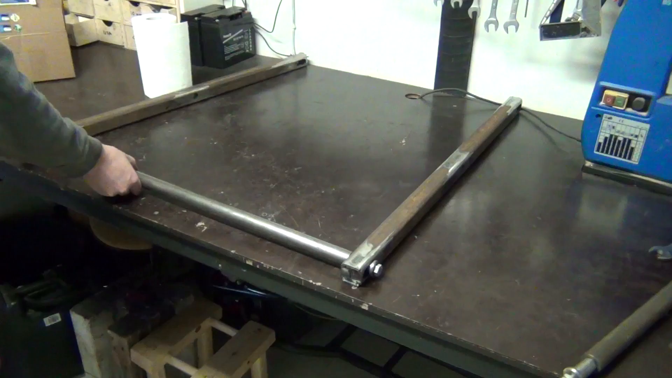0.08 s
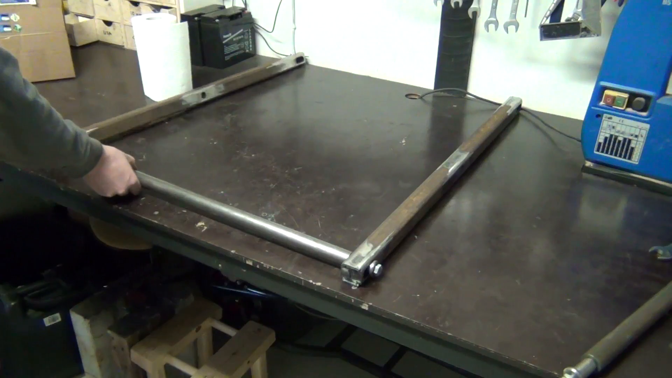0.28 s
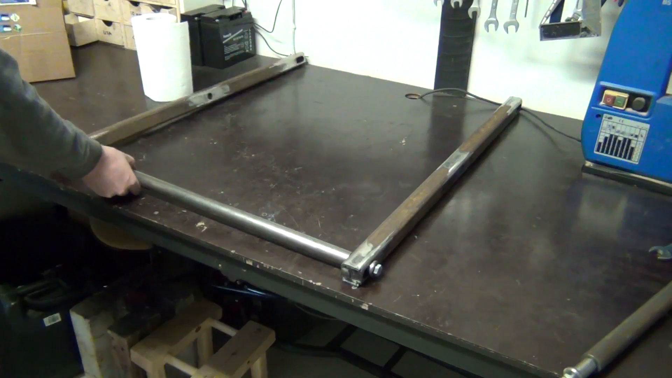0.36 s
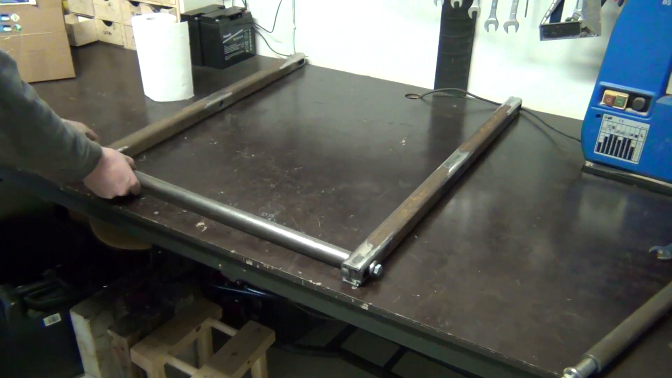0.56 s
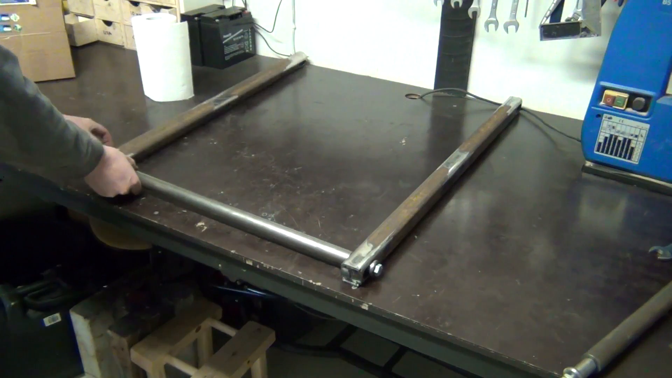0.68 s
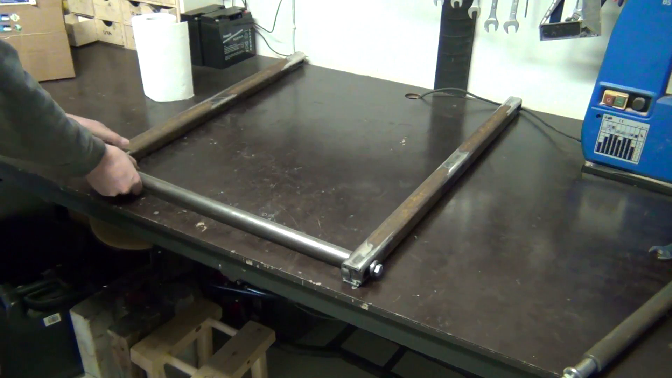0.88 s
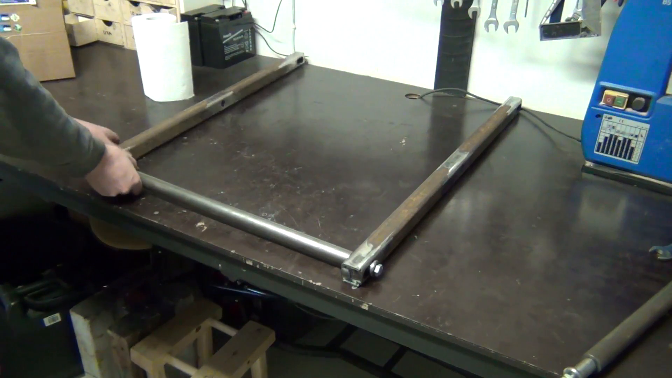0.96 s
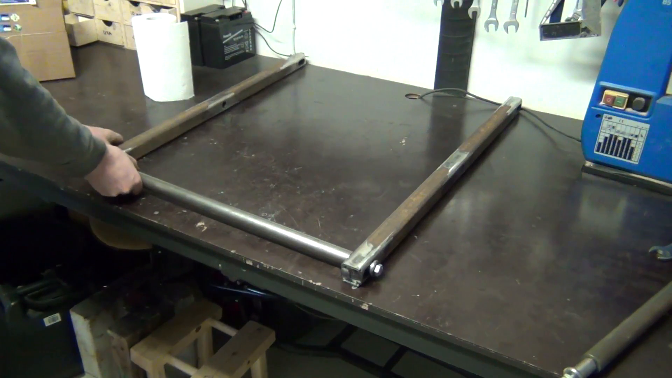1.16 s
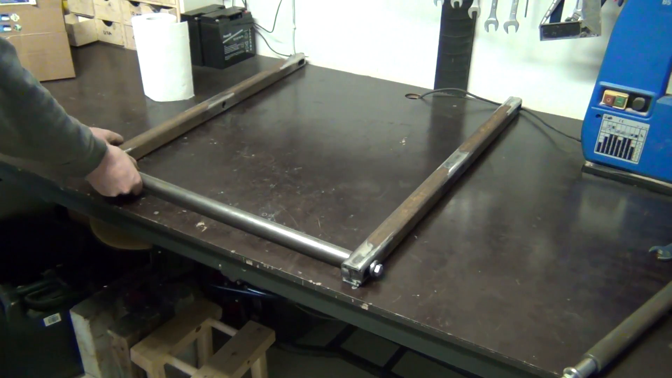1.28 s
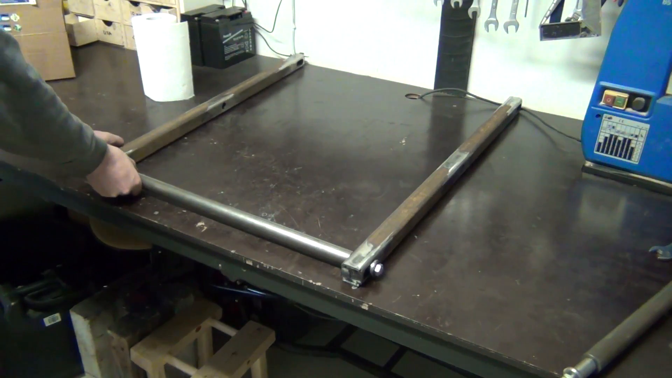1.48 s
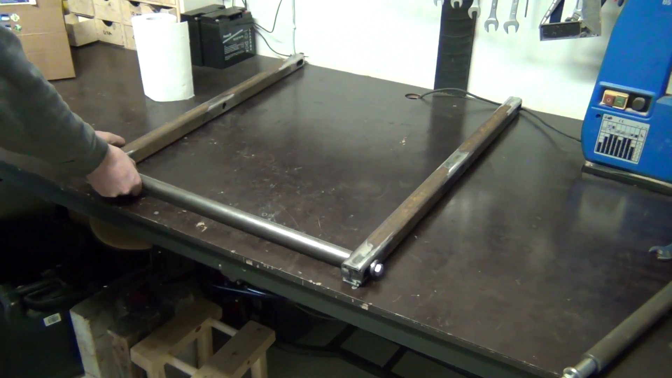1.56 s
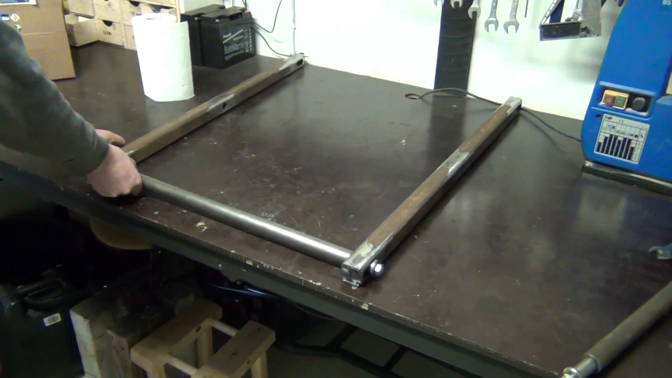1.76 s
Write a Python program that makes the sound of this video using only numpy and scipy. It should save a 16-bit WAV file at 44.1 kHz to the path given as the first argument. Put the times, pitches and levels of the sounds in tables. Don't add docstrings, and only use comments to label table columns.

```python
import sys
import numpy as np
from scipy import signal
from scipy.fft import rfft, irfft
from scipy.io import wavfile

SR = 44100
rng = np.random.default_rng(int(sys.argv[2]) if len(sys.argv) > 2 else 0)


def how_loud(loudness_db):
    steps = np.asarray(loudness_db, float) / 20
    return 10 ** steps


def store_wav(level_fs):
    pcm = np.round(np.clip(np.atleast_2d(level_fs), -1, 1) * 32767)
    wavfile.write(sys.argv[1], SR, pcm.T.astype(np.int16))


N = 79380

# start_s, level_db, fade_s, hardness_db
JOLTS = [(0.397, -20, 0.0064, -4), (.413, -28.5, 0.0097, 3), (0.445, -12, 0.009, 5.5),
         (0.46, -10.5, 0.0078, 2), (0.469, -12.5, 0.0047, 0), (0.487, -14.5, 0.018, 0),
         (.517, -21, 0.0083, 3.5), (0.541, -22, 0.0059, -3), (.562, -34, 0.0044, -17),
         (0.574, -49, .006, 0), (0.645, -20, 0.014, -0.5), (0.675, -17.5, 0.025, 7.5),
         (0.721, -18.5, 0.0061, 10), (0.9, -24.5, 0.0035, 1), (0.918, -27, .006, 6),
         (.943, -12.5, 0.0062, -5), (0.961, -12.5, 0.0083, 7.5), (0.983, -18, .006, -2),
         (0.997, -10, 0.0047, 2.5), (1.007, -18, 0.0091, -2), (1.03, -17, 0.0057, -5),
         (1.044, -15.5, 0.0061, -4), (1.07, -18.5, 0.024, -5), (1.084, -18.5, 0.012, -1),
         (1.159, -39, 0.0027, -6)]
# pitch_hz, level_db, t60_s (time to fade by 60 dB)
BENCH_MODES = [(61.6, -8.5, 0.18), (123.2, -5.5, 0.19), (182.7, -8.5, 0.24), (239, -8, 0.032),
               (274.2, -3, 0.082), (314.9, 0, 0.049), (377.7, -6, 0.082), (399, -13, 0.13),
               (460.5, -5.5, 0.069), (527.4, -4, 0.088), (580, -11, 0.033), (605, -5.5, 0.024),
               (705, -5.5, 0.041), (770.7, -3, 0.12)]
SCATTER_DB = 2.5


def rms_one(x):
    return x / np.sqrt(np.mean(x ** 2) + 1e-20)


def ring(clicks, hz, t60):
    radius = how_loud(-60 / (t60 * SR))
    angle = 2 * np.pi * hz / SR
    return signal.lfilter([0, np.sin(angle)], [1, -2 * radius * np.cos(angle), radius ** 2], clicks + 1e-18)


def colour(noise, points):
    hz = np.maximum(np.fft.rfftfreq(N, 1 / SR), 1)
    at_hz, db = np.transpose(points)
    gain = how_loud(np.interp(np.log(hz), np.log(at_hz), db, left=-60))
    return irfft(rfft(noise) * gain, N)


def leftover():
    # pitch_hz, level_db (rms)
    old_tones = [(323.0, -61), (786.0, -55), (1373, -57), (1588, -60.5), (2256, -68), (3149, -62),
                 (3973, -63.5), (4861, -64), (5426, -66.5), (5744, -66), (6665, -69), (7827, -83),
                 (8952, -82)]
    hz, db = np.transpose(old_tones)[:, :, None]
    t = np.arange(N) / SR
    level = how_loud(db + 3.5 - 60 * t / 1)
    return (level * np.sin(2 * np.pi * (hz * t + rng.random(hz.shape)))).sum(axis=0)


def room_hum():
    # pitch_hz, level_db
    hum_spectrum = [(25, -14), (189, -9), (601, -11.5), (766, -5), (950, -12.5), (1770, -13.5), (3000, -16),
                    (15700, -29.5)]
    hush_s, hush_db = 0.077, -2
    mid, side = (rms_one(colour(v, hum_spectrum)) for v in rng.standard_normal((2, N)))
    level_db = -50 + hush_db * (np.arange(N) < hush_s * SR)
    return how_loud(level_db) * (mid + how_loud(-10) * side * [[1], [-1]])


def shove():
    # start_s, push_db, hardness_db
    shove_tables = [
        [(0.065, -52, 4), (0.127, -43.5, 13.5), (0.2, -62, 3)],
        [(0.214, -30, 7), (0.242, -27.5, -2), (0.375, -46.5, 10)],
        [(0.389, -13.5, 7.5), (0.399, -20, -3.5), (0.44, -19.5, -5.5)],
        [(0.446, -20, -5), (0.492, -12.5, -2.5), (0.595, -25.5, 11.5)],
        [(0.602, -21, 14), (0.666, -31, 23), (0.76, -35, 7), (0.845, -35, 17)],
        [(0.861, -17, -1.5), (0.889, -16, 7.5), (0.938, -18.5, 4)],
        [(0.943, -16.5, 5), (1.06, -16.5, 7), (1.11, -21.5, 4), (1.29, -38, 3.5)],
        [(1.3, -33, 6), (1.472, -27.5, 5), (1.69, -51, -11)],
        [(1.718, -41.5, 1), (1.77, -41.5, -10.5)],
        [(1.781, -34, 19.5), (1.8, -40, 12)],
    ]
    t, push, hard = np.arange(N) / SR, np.zeros(N), np.zeros(N)
    for rows in shove_tables:
        s, db, hard_db = np.transpose(rows)
        on = (t >= s[0]) & (t <= s[-1])
        push += on * how_loud(np.interp(t, s, db))
        hard += on * how_loud(np.interp(t, s, db + hard_db))
    for s, db, fade, hard_db in JOLTS:
        jolt = how_loud(db) * (t >= s) * np.exp(-np.abs(t - s) / fade)
        push += jolt
        hard += how_loud(hard_db) * jolt
    return push, hard


def slips(rate):
    sizes = how_loud(2.07 * np.minimum(rng.exponential(1, N), 5)) * rng.choice([-1, 1], N)
    clicks = rms_one(sizes * (rng.random(N) < rate / SR))
    kicks = np.zeros(N)
    kicks[(np.transpose(JOLTS)[0] * SR).astype(int) + 2] = how_loud(7.5) * rng.choice([-1, 1])
    return clicks + np.convolve(kicks, np.hanning(16))[:N]


def bench(push, hard):
    # pitch_hz, level_db (per Hz)
    upper_spectrum = [(800, -6.5), (1400, -7.5), (2200, -19), (3200, -29), (5000, -35), (9500, -42),
                      (14000, -55)]
    slips_per_s, upper_cycles = 700, 40.2
    low = np.zeros(N)
    for hz, db, t60 in BENCH_MODES:
        low += how_loud(db) * ring(slips(slips_per_s) * push, hz, t60) / np.sqrt(t60 * SR / 28) / 3

    at_hz, upper_db = np.transpose(upper_spectrum)
    high, grit = np.zeros(N), slips(3 * slips_per_s) * hard
    for k, hz in enumerate(np.geomspace(820, 14500, 44) * rng.uniform(0.98, 1.02, 44)):
        t60 = upper_cycles / hz
        gain = how_loud(np.interp(np.log(hz), np.log(at_hz), upper_db)) * (-1) ** k
        high += gain * ring(grit, hz, t60) * np.sqrt(hz / 1000 / t60 / SR * 7)
    return low + how_loud(-8) * high


def pings():
    # start_s, pitch_hz
    touches = [(.08, 1838), (.105, 780), (.23, 314), (.455, 6745), (.52, 5830), (.66, 2310), (.69, 277),
               (.945, 5830), (.946, 4813), (.975, 6745), (.99, 267), (.997, 5830), (1.02, 4813),
               (1.068, 279), (1.33, 3040), (1.43, 248), (1.432, 4813), (1.435, 1397), (1.49, 236),
               (1.525, 2310)]
    # level_db, t60_s
    touch_rings = [(-44.5, .15), (-42, 0.28), (-24.5, 0.21), (-48, .2), (-44, 0.44), (-30.5, 0.41),
                   (-27.5, 0.7), (-36, 0.1), (-36, 0.1), (-56, 0.11), (-12, 0.18), (-40, 0.18), (-41, 0.11),
                   (-13, 0.13), (-44.5, 0.35), (-29, 0.38), (-46, 0.33), (-36, 0.43), (-26, 0.35),
                   (-45, 0.34)]
    s, hz = np.transpose(touches)[:, :, None]
    db, t60 = np.transpose(touch_rings)[:, :, None]
    t = np.maximum(np.arange(N) / SR - s, 0)
    rise = np.minimum(t * hz / 1.7, 1)
    return (how_loud(db - 60 * t / t60) * np.sin(2 * np.pi * hz * t) * rise).sum(axis=0)


def cracks():
    # start_s, level_db, low_edge_hz, decay_s
    crack_table = [(0.216, -37, 3800, 0.004), (.221, -24.5, 700, 0.0097), (0.388, -23, 1170, 0.0014),
                   (0.392, -40, 7040, 0.019), (0.4477, -14, 447, 0.02), (.602, -21, 1790, 0.017),
                   (.647, -32, 500, .008), (.861, -13, 920, 0.018), (0.863, -21, 6300, 0.0029),
                   (.899, -32, 8100, 0.0029), (0.943, -18, 690, 0.0089), (1.237, -44, 7050, .003),
                   (1.3995, -27.5, 1400, 0.0021), (1.4065, -28, 1490, .004), (1.779, -38.5, 2350, 0.02)]
    out, t = np.zeros(N + 4000), np.arange(4000) / SR
    for s, db, low_hz, decay in crack_table:
        burst = rng.standard_normal(4000) * np.exp(-t / decay)
        band = signal.butter(2, [low_hz, min(3.06 * low_hz, 13000)], "band", fs=SR, output="sos")
        i = int(s * SR)
        out[i:i + 4000] += how_loud(db + 1) * signal.sosfilt(band, burst)
    return out[:N]


def knocks():
    # start_s, level_db, best_pitch_hz, ring_length (times the modes' t60)
    knock_table = [(.226, -13, 113.4, 2.2), (0.247, -13, 147, 2.5), (0.397, -17, 125, 1.5),
                   (.447, -5, 700, 1.0), (.48, -13.5, 71, 1.5), (0.893, -7.5, 63, 1.5),
                   (.975, -16, 320, 1.4), (1.07, -18, 340, 1.2), (1.363, -20, 206, 1.8),
                   (1.411, -21.5, 198, 1.5), (1.466, -21.5, 242, 1.5), (1.571, -30.5, 220, 1.6)]
    hz, db, t60 = np.transpose(BENCH_MODES)[:, :, None]
    out, t = np.zeros(N + SR // 2), np.arange(SR // 2) / SR
    for s, hit_db, best_hz, longer in knock_table:
        level = hit_db - 17 * np.abs(np.log2(hz / best_hz))
        level = level + rng.normal(0, 0.63, hz.shape) - 60 * t / (t60 * longer)
        tones = how_loud(level - 4.5) * np.sin(2 * np.pi * hz * t) * rng.choice([-1, 1], hz.shape)
        i = int(s * SR)
        out[i:i + len(t)] += tones.sum(axis=0)
    return out[:N]


def tube():
    # pitch_hz, level_db, t60_s
    tube_modes = [(2003, -0.5, 0.067), (3240, -1, 0.13), (4780, 1.5, 0.031), (5830, -10.5, 0.036),
                  (6400, -6, 0.027), (6690, -6.5, 0.041), (9400, -25, 0.041), (9670, -5.5, 0.13),
                  (11700, -10, 0.049), (12600, -20, 0.034)]
    # start_s, level_db, best_pitch_hz, chatter_fade_s
    tube_blows = [
        (.452, -54, 6840, .04),
        (0.6, -21.5, 5700, 0.028),
        (.612, -13.5, 3270, 0.018),
        (0.947, -31.5, 5830, 0.081),
        (1.022, -37.5, 5000, 0.037),
        (1.313, -35.5, 3520, 0.0078),
        (1.325, -44, 4800, 0.015),
        (1.401, -19, 2450, 0.0057),
        (1.4051, -23.5, 5100, 0.0036),
        (1.428, -36, 4540, 0.044),
    ]
    chatter_per_s, skirt_octaves = 2600, 0.76
    t, out = np.arange(N) / SR, np.zeros(N)
    for hz, db, t60 in tube_modes:
        chatter = (rng.random(N) < chatter_per_s / SR) * rng.normal(0, 0.4, N)
        clicks = np.zeros(N)
        for s, hit_db, best_hz, fade in tube_blows:
            level = hit_db + db - 17.5 * abs(np.log2(hz / best_hz))
            gain = how_loud(level + rng.normal(0, SCATTER_DB))
            clicks += gain * chatter * (t > s) * np.exp(-np.abs(t - s) / fade)
            clicks[int(s * SR)] += gain
        skirts = hz * 2 ** (skirt_octaves * np.array([-1, 1]))
        band = signal.butter(1, skirts, "band", fs=SR, output="sos")
        out += signal.sosfilt(band, ring(clicks, hz, t60))
    return out


def rail():
    bend_hz = [277, 745, 768, 1163, 1397, 1572, 2075, 2238, 2310, 3040, 3155, 3988, 4339, 4538]
    bend_db = [-1.5, 3, 5.5, 3, -0.5, -7.5, -6.5, -12, -5.5, -6.5, -4, -13.5, -23, -12]
    bend_t60 = [0.81, 0.48, 0.17, 0.1, 0.55, 0.33, 0.29, 0.68, 0.28, 0.62, 0.97, 0.9, 0.84, 0.46]
    wall_hz = [4813, 5227, 5448, 5724, 5830, 5932, 6584, 6745, 7084, 7359, 7833, 8403, 8947, 9415]
    wall_db = [-12.5, -17.5, -21, -15, -13.5, -20, -30, -17.5, -26, -26, -17.5, -21, -15.5, -18]
    wall_top_hz = [9518, 9643, 9808, 10610, 10720, 10970, 11520, 12300, 12700, 13250, 13900]
    wall_top_db = [-20, -23.5, -17.5, -21, -21, -23, -31, -33, -32, -37, -47]
    # start_s, level_db, best_pitch_hz, stopped_at_s
    rail_blows = [(0.605, -19.5, 8600, 0.79), (.647, -14.5, 750, 0.68), (0.646, -27.5, 1400, 1.1),
                  (0.654, -28, 3070, 1.2), (0.656, -32.5, 7640, 1.2), (0.683, -23.5, 280, 1.4),
                  (.722, -23.5, 1310, 0.797), (1.326, -34.5, 720, 2.1), (1.329, -42, 3200, 1.75),
                  (1.42, -48, 10000, 2.3), (1.43, -39.5, 1460, 1.45), (1.721, -47, 1083, 1.72)]
    hz = np.concatenate([bend_hz, wall_hz, wall_top_hz])[:, None]
    db = np.concatenate([bend_db, wall_db, wall_top_db])[:, None]
    t60 = np.concatenate([bend_t60, [0.58] * len(wall_hz), [0.63] * len(wall_top_hz)])[:, None]

    lean_db = rng.normal(0, 3.5, len(hz)) * np.minimum(hz[:, 0] / 3000, 1)
    sides = how_loud(np.array([lean_db, -lean_db]))
    phase = rng.random(hz.shape)
    beat_hz = 29.92 * rng.uniform(0.402, 1.6, hz.shape)
    out = np.zeros((2, N))
    for s, hit_db, best_hz, stop in rail_blows:
        i = int(max(s, 0) * SR)
        t = np.arange(min(N - i, int((stop - s + 0.1) * SR))) / SR
        level = hit_db + db - 8 * np.abs(np.log2(hz / best_hz))
        level = level + rng.normal(0, SCATTER_DB, hz.shape) - 60 * t / t60
        tones = how_loud(level) * np.sin(2 * np.pi * (hz * (t + i / SR) + phase))
        tones *= np.minimum(t * hz / 2, 1)
        tones *= 1 + 0.45 * (hz > 4200) * np.sin(2 * np.pi * (beat_hz * (t + s) + phase))
        stopping = np.exp(-np.maximum(t - stop + s, 0) / 0.0073)
        out[:, i:i + len(t)] += sides @ tones * stopping
    return out


def workshop(x):
    t = np.arange(SR // 2) / SR
    tail = rng.standard_normal((2, len(t))) * how_loud(-60 * t / 0.27) * (t > 0.003)
    tail = signal.lfilter(*signal.butter(1, [163, 16400], "band", fs=SR), tail)
    tail /= np.sqrt((tail ** 2).sum() / 2)
    return signal.fftconvolve(x[None], tail, axes=1)[:, :N]


def scene():
    push, hard = shove()
    near = leftover() + bench(push, hard) + pings() + cracks() + knocks() + tube() + rail()
    near = signal.sosfilt(signal.butter(2, 18700, fs=SR, output="sos"), near)
    return near + how_loud(-8) * workshop(near.mean(axis=0)) + room_hum()


def roll_off(x):
    return signal.sosfilt(signal.butter(12, 15810, fs=SR, output="sos"), x)


def record(dry):
    bass_lean_db, ceiling = 2, 0.85
    dry = signal.sosfilt(signal.butter(4, 50.3, "high", fs=SR, output="sos"), dry)
    bass = signal.lfilter(*signal.butter(1, 170, fs=SR), dry)
    leaning = dry + bass * (how_loud(np.array([[-bass_lean_db], [bass_lean_db]])) - 1)
    rounded = ceiling * np.tanh(leaning / ceiling)
    mix = signal.sosfilt(signal.cheby2(12, 70, 16150, fs=SR, output="sos"), rounded)
    return roll_off(mix)


dry = scene()
out = record(dry)
store_wav(out)
```